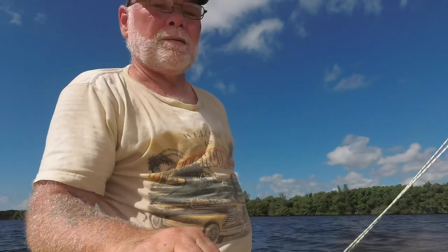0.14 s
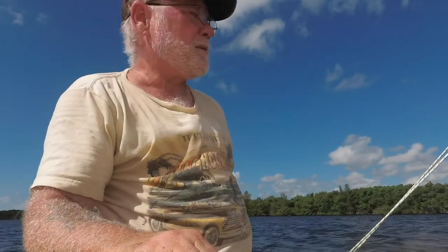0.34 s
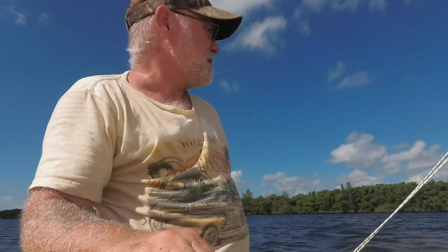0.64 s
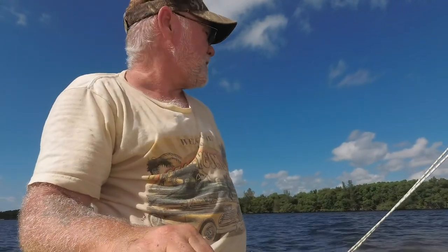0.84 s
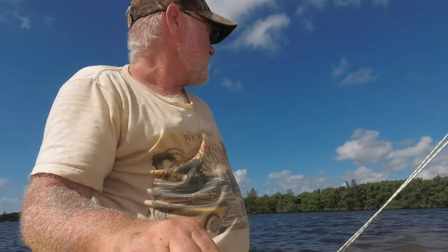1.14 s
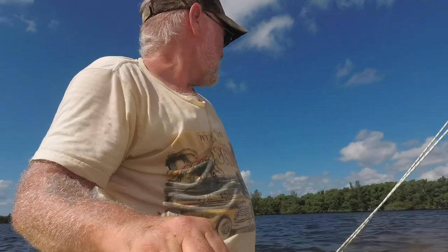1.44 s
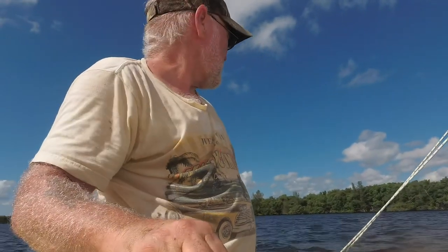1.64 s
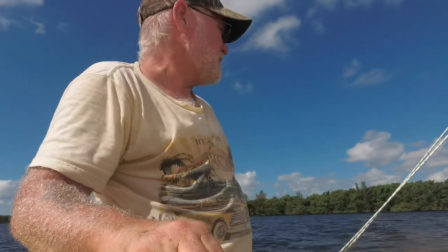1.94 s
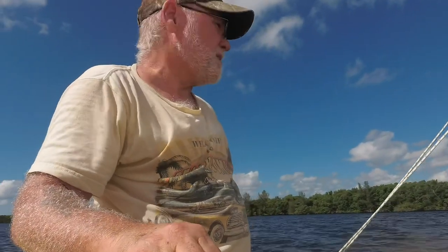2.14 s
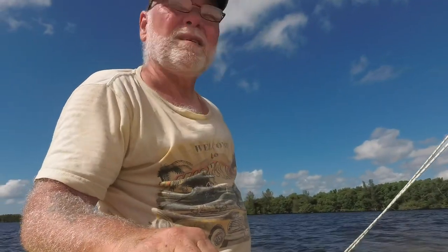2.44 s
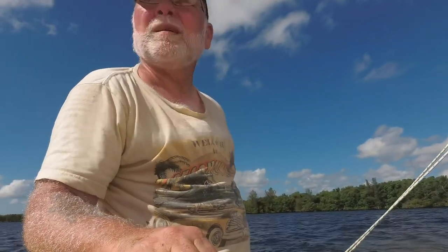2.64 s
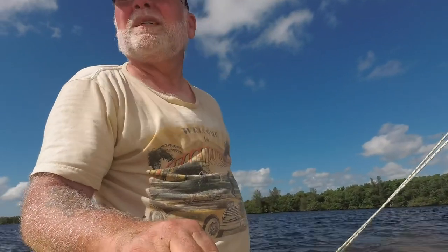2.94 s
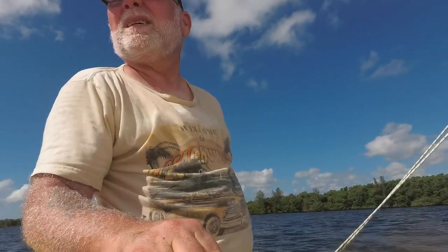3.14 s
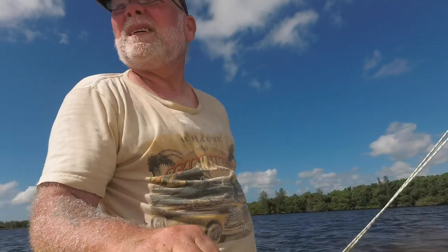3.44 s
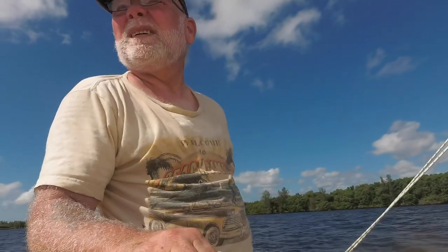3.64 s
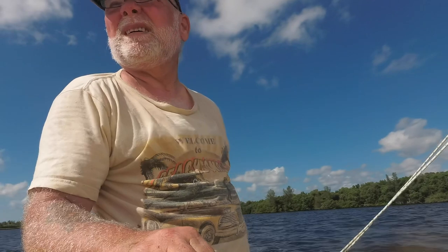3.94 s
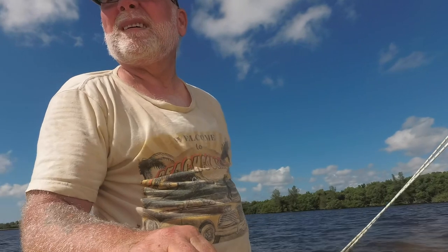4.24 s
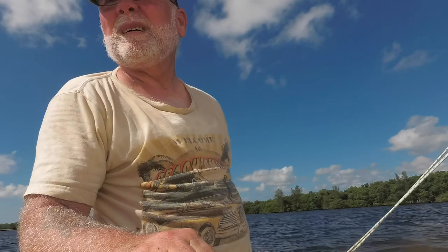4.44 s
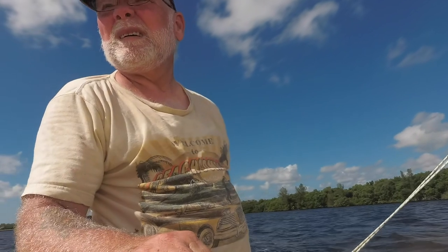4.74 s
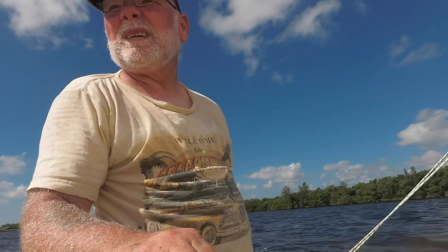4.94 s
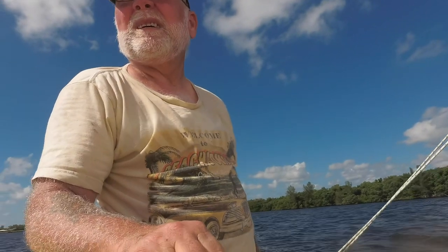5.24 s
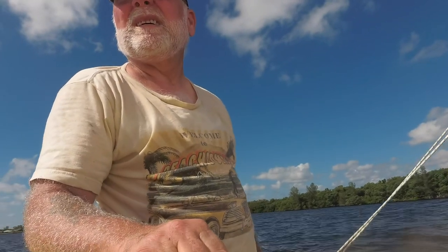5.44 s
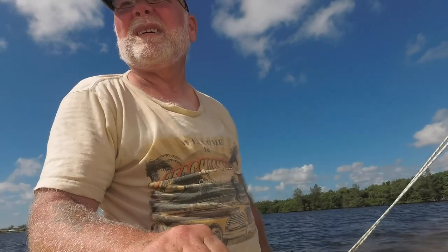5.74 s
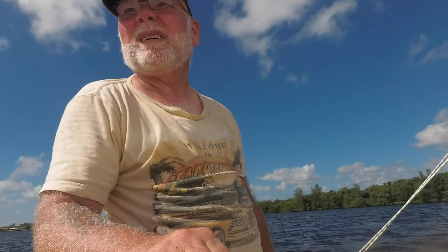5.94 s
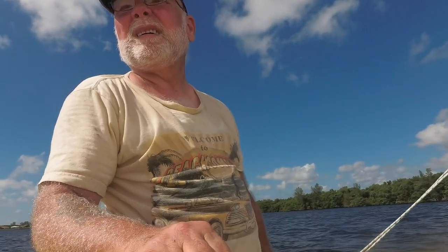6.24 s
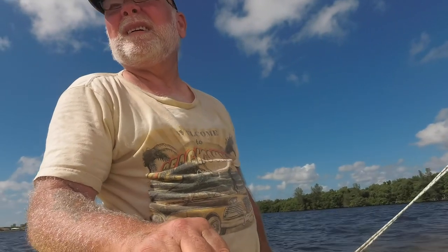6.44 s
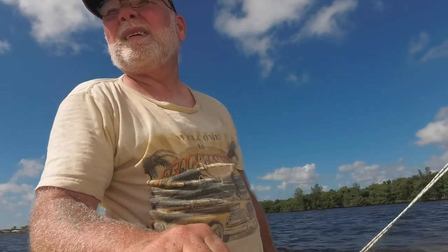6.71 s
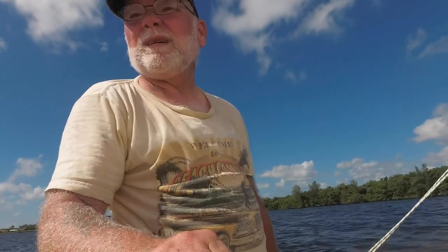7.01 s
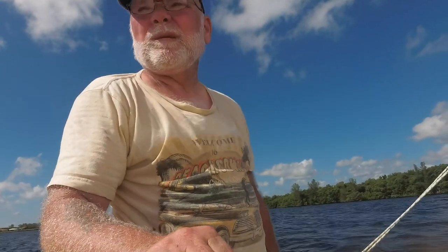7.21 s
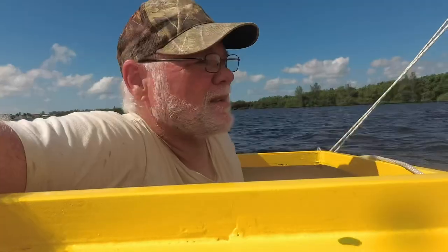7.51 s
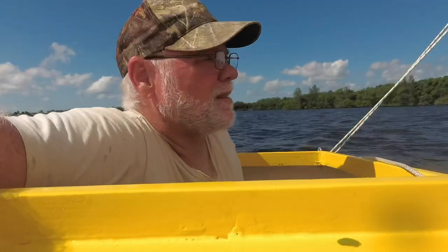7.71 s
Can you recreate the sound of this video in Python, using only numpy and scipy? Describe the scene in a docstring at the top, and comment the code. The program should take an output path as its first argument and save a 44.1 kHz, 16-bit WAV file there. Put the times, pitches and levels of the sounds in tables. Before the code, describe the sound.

Very close to the hollow hull of a small sailboat on a river, low hollow thumps and wet slaps come irregularly over steady lapping, with gurgles, plops and tiny drop ticks. They bunch up near three seconds; a heavy wave slams and clips past midway. A faint low hum steps up at the end under a brighter splashy rush. Right-heavy stereo, slight microphone hiss.

```python
"""On a river, close to the hollow hull of a small sailboat: water laps and slaps, heard by two microphones.
Air pockets thump as gliding tones and a shaken hull; crests ring the panels and drop spray; bubbles gurgle.
One heavy wave slams under the hull as short swings of pressure, so loud that the sound clips.
A faint motor-like hum of four partials runs underneath; near the end it steps up and noise rushes brighter.
Hiss and a thin buzzing whine lie behind it all, and the left microphone clicks once."""
import sys
import numpy as np
from scipy import signal
from scipy.fft import rfft, irfft, next_fast_len
from scipy.io import wavfile
from scipy.ndimage import uniform_filter1d, map_coordinates

SR = 44100
rng = np.random.default_rng(int(sys.argv[2]) if len(sys.argv) > 2 else 0)


def digitize_waveform(pressure):
    """Quantize a signal to 16-bit integers and store it at the path in sys.argv[1].

    Rows of a 2-D input are taken as channels; values are limited to [-1, 1].
    """
    field = np.atleast_2d(pressure).T
    bounded = np.clip(field, -1, 1)
    quanta = np.round(bounded * 32767).astype(np.int16)
    wavfile.write(sys.argv[1], SR, quanta)


N = 347111
TIME = np.arange(N) / SR
SHORT = np.arange(SR // 3) / SR  # time within one single sound, which is cut off after a third of a second

# All T60 and ring times are the time to fall by 60 dB.

# the steady lapping: [t/s, hull drone level/dB, ripple level/dB]; lapping() raises both a little
LAPPING = [(0.0, -30.5, -48.5), (0.52, -33, -48), (0.64, -38, -55), (1.16, -31, -45), (1.47, -34.5, -50.5),
           (2.85, -34, -49.5), (3.16, -36, -53.5), (3.45, -31, -46.5), (3.6, -32, -46.5),
           (3.86, -36, -58.5), (3.97, -32, -46), (4.1, -32, -50.5), (4.45, -33.5, -46.5),
           (4.84, -31.5, -48), (5.28, -34.5, -47), (5.63, -29, -45), (5.85, -31.5, -48), (6.18, -33, -46.5),
           (6.75, -32.5, -48.5), (7.34, -29, -45), (7.69, -41.5, -48), (7.87, -36, -46.5)]
# fizz along the waterline: [t/s, level/dB]; lapping() raises it a little
FIZZ = [(0.0, -58), (0.52, -62.5), (0.66, -61.5), (1.17, -59), (1.5, -63.5), (4.2, -61), (5.63, -60),
        (5.96, -62.5), (6.66, -61.5), (6.95, -56.5), (7.25, -54.5), (7.42, -59.5), (7.52, -52.5),
        (7.87, -78)]
FIZZ_GROWS = 0.19  # dB more fizz for each dB of ripple
# the hull heaves with each thump and settles after it; the ripples do the same around each slap
CHURN_RISE_S, CHURN_FALL_S = 0.0097, 0.039
SLOSH_RISE_S, SLOSH_FALL_S = 0.02, 0.024
CHURN_LAG_S = 0.0067  # the churning is strongest just after the blow
CHURN_DRONE_DB, CHURN_RIPPLE_DB = -13, -14.5  # churning against the peak of its thump or slap
CHURN_LIMIT_DB, SLOSH_LIMIT_DB = -29.5, -38.5  # the most drone and ripple that one wave can add

# the hollow hull's low resonances: [f/Hz, width/Hz, level/dB]
HULL = [(169.5, 56, -12.5), (176, 11, -4), (231.7, 58, -4), (255.45, 6.9, 6.5), (365.3, 18, -3)]
# resonances of the side panels: [f/Hz, width/Hz, level/dB]
PANELS = [(570, 114, 4), (696, 47, 0), (774, 13.7, 5), (845, 250, -0.5), (1098, 92, -4.5), (1211, 38, 6.5)]
# resonances of the stiff rim and other small hard parts: [f/Hz, width/Hz, level/dB]
RIM = [(1642, 190, 11), (1976, 35, 5.5), (2080, 180, 6), (2550, 112, 3.5), (3066, 52, 0.5), (3130, 110, -1),
       (3360, 65, 4.5), (3440, 114, -6), (3690, 130, -7)]

# air pockets squeezed under the hull: [t/s, peak level/dB, starting f/Hz]
THUMPS = [(0.023, -15.5, 259), (0.045, -18.5, 262), (0.076, -19.5, 229), (1.084, -16.5, 271),
          (1.119, -16, 162.3), (1.166, -24, 350.5), (1.801, -17, 365), (2.324, -19.5, 272),
          (2.908, -13, 223), (2.922, -14.5, 333), (2.945, -14, 330), (2.957, -13, 174), (2.995, -9, 237.4),
          (3.023, -9, 273), (3.194, -17.5, 241.6), (3.215, -9.5, 236), (3.257, -16.5, 338.6),
          (3.532, -12.5, 256), (3.767, -10.5, 257), (3.989, -19.5, 346), (4.088, -7, 220.4),
          (4.639, -3.5, 280), (4.654, 0, 205), (4.676, -12, 236), (4.694, -8.5, 238), (4.971, -12, 197),
          (5.198, -13.5, 329), (5.434, -6.5, 237), (5.447, -19, 197), (5.568, -12.5, 275.5),
          (5.676, -15, 259.6), (5.709, -15, 257), (5.743, -16, 365), (5.944, -16.5, 335.4),
          (6.129, -18, 189), (6.362, -17.5, 302), (6.38, -18, 354), (6.403, -11.5, 175), (6.42, -22, 165),
          (6.666, -15, 262), (6.985, -16.5, 352), (7.214, -11.5, 168), (7.248, -8.5, 255.5),
          (7.26, -5.5, 207), (7.268, -9.5, 364), (7.655, -8.5, 205), (7.665, -14.5, 298.6)]
MIDDLING_DB, THUMP_T60_S = -8.5, 0.11  # peak and ring of a middling thump
CHOKE = 0.61  # how much a harder thump shortens its ring: dB per dB

# crests breaking on the side, the big ones in several strokes:
# [t/s, peak level/dB, spray level against that peak/dB, pitch of the hollow under the crest f/Hz]
SLAPS = [(0.022, -26.5, -10, 810), (0.075, -35, -11, 850), (0.096, -37, -2, 900), (0.168, -33.5, -10, 695),
         (0.387, -28.5, -10, 1100), (0.5, -31.5, -6, 640), (0.729, -26, -12, 1160), (1.076, -44, -22, 900),
         (1.163, -24, -10.5, 770), (1.18, -25.5, -12, 756), (1.924, -33, -2.5, 860), (1.962, -32, -1, 740),
         (2.32, -24.5, -18, 770), (2.449, -34.5, -2, 730), (2.904, -27.5, 1, 1120), (2.914, -36, 0, 950),
         (2.939, -24.5, -4, 890), (2.948, -31, -1, 800), (2.966, -25.5, -4, 910), (2.974, -26.5, -5, 800),
         (2.986, -22.5, -9, 780), (3.252, -27, -27, 680), (3.264, -27, -25, 695), (3.277, -38, -27, 670),
         (3.52, -13, -5.5, 930), (3.526, -19, -4, 1110), (3.533, -21, -18, 756), (3.762, -25.5, 1, 890),
         (3.768, -25.5, -1, 840), (3.777, -31, -6, 796), (4.061, -33, -22, 640), (4.086, -23, -8.5, 735),
         (4.104, -32, -19, 700), (4.189, -27, -26, 900), (4.654, -34.5, -4, 895), (5.2, -32.5, -12, 920),
         (5.428, -20.5, -6, 760), (5.441, -25.5, -3, 760), (5.57, -21.5, -32, 920),
         (6.137, -34.5, -0.5, 930), (6.382, -29, -11, 604), (6.42, -27.5, -29, 590), (6.986, -29, -17, 600),
         (7.203, -26, -10, 800), (7.22, -28, -16, 880), (7.248, -35, -14, 570), (7.264, -24, -20, 650),
         (7.648, -22, -6, 980), (7.656, -23, -11, 820), (7.669, -45, -19, 780)]
SMACK_ATTACK_S, SMACK_T60_S, SPRAY_T60_S = 0.001, 0.054, 0.072  # every slap dies away alike
SPRAY_DROPS_PER_S = 2600  # average number of drops landing from a breaking crest
IMPACT_DB = 21  # the crest's first contact against the noisy push that follows

# the heaviest wave slams flat under the hull in quick blows: [t/s, level/dB]
SLAMS = [(4.6428, 3), (4.6545, -0.5), (4.6789, -2.5), (4.698, -2.5)]
SLAM_HZ, SLAM_WIDTH_S = 244, 0.002  # the hull's swing under a blow; half the length of the blow
SLAM_CRACK_DB = -38.5  # the panels' crack against the blow

# large air pockets that boom on after a wave: [t/s, level/dB, starting f/Hz, ring/s]
GULPS = [(3.79, -19, 246, 0.083), (4.66, -8, 366, 0.11), (4.699, -12.5, 150.2, 0.28),
         (4.831, -28.5, 256.6, 0.92), (5.75, -18.5, 363, 0.085), (6.84, -26, 359.3, .12),
         (7.275, -20.5, 363, .13)]
# air breaking up into a cluster of small bubbles: [t/s, peak level/dB, middle f/Hz, length/s]
GURGLES = [(0.074, -30.5, 853, .045), (0.089, -39, 1560, 0.019), (0.155, -34, 920, 0.053),
           (0.515, -43, 1040, 0.025), (0.978, -44, 1580, 0.022), (0.968, -37.5, 828, 0.032),
           (2.149, -42, 960, 0.022), (2.955, -30, 750, .045), (3.071, -35.5, 710, 0.0204),
           (3.46, -37.5, 1630, .015), (3.556, -39, 1040, 0.045), (3.677, -38.5, 1170, 0.022),
           (3.952, -37.5, 866, 0.023), (3.998, -31, 770, 0.045), (4.283, -38, 1080, 0.027),
           (4.398, -44, 1070, .02), (4.447, -44, 1920, 0.035), (4.506, -30, 746, .04),
           (4.866, -42.5, 1125, .05), (5.443, -31, 765, 0.0147), (5.494, -38, 1195, 0.028),
           (5.692, -40, 1060, .015), (5.749, -37.5, 1060, .015), (5.778, -36, 1090, 0.052),
           (6.237, -39, 1030, 0.045), (6.749, -44, 1630, .015), (6.904, -37.5, 1190, 0.018),
           (7.22, -27.5, 818, 0.03), (7.235, -36.5, 1600, 0.035), (7.528, -32, 920, .02)]
GURGLE_SPREAD, GURGLE_CYCLES = 0.077, 31  # scatter of pitch in a cluster; ring of a bubble in cycles
# single large bubbles: [t/s, peak level/dB, f/Hz, ring/s]; bubbles() starts them slightly lower
BUBBLES = [(0.168, -31, 574, 0.24), (0.903, -36, 1090, 0.051), (0.905, -36.5, 565, 0.099),
           (0.998, -32.5, 693, .07), (1.674, -39, 1207, 0.078), (1.807, -31.5, 496, 0.063),
           (2.643, -36.5, 1625, 0.045), (2.92, -28, 743, 0.039), (2.973, -22, 767, 0.11),
           (3.292, -25.5, 600, 0.036), (3.517, -27, 830, 0.087), (3.785, -28.5, 751, 0.058),
           (4.06, -27.5, 609, 0.06), (4.469, -39.5, 1600, 0.052), (4.76, -38, 1116, 0.081),
           (4.779, -35, 763, 0.078), (5.361, -31, 586, 0.12), (5.987, -36.5, 536, 0.085),
           (5.565, -30.5, 934, 0.049), (6.262, -24.5, 862, 0.065), (6.597, -25.5, 589, 0.15),
           (7.263, -25.5, 574, 0.094), (7.29, -29, 587, 0.16)]
# single drops ticking on the side: [t/s, peak level/dB, f/Hz]
DROPS = [(0.096, -44, 2020), (0.517, -43, 2030), (1.141, -40, 1730), (1.786, -44, 2050), (1.994, -39, 1660),
         (2.705, -42, 3810), (2.883, -42, 2580), (2.973, -34, 2070), (3.005, -35, 1600), (3.017, -42, 1940),
         (3.086, -45, 2580), (3.2567, -32, 1530), (3.6237, -42, 3600), (3.674, -43.5, 2000),
         (4.983, -33.5, 1630), (5.303, -42, 1750), (5.381, -38, 2010), (7.105, -47, 2630),
         (7.129, -41, 3380), (7.15, -38, 1900), (7.371, -37.5, 2400), (7.648, -24.5, 3400)]

# resonances of the rush along the hull at the end: [f/Hz, width/Hz, level/dB]
WASH = [(258, 16, 18), (815, 120, -24), (1200, 37, -26), (1690, 400, -32), (2040, 90, -24.5),
        (2550, 90, -25), (3380, 300, -23), (3910, 200, -23.5), (4800, 680, -27)]
# the rush as a whole: [t/s, level/dB]
WASH_LEVEL = [(7.45, -31.5), (7.54, -28), (7.63, -32.5), (7.7, -35), (7.76, -34), (7.82, -30.5),
              (7.87, -32.5)]
WASH_START_S = 7.45
# spurts of that rush: [t/s, peak level/dB, f/Hz]
SPURTS = [(7.451, -48, 2090), (7.464, -35, 1230), (7.497, -35.5, 2550), (7.524, -37, 2570),
          (7.526, -39, 2080), (7.572, -44, 3940), (7.585, -39, 1210), (7.607, -41, 1220),
          (7.658, -38, 2660), (7.672, -32, 3450), (7.684, -39, 4000), (7.696, -37, 4800),
          (7.718, -42, 4000), (7.795, -44, 4250), (7.817, -37, 3980)]
SPURT_T60_S, SPURT_WIDTH_HZ = 0.057, 170  # every spurt dies away alike and fills a narrow band

# a low hum, as of a small electric motor: [t/s, f/Hz, level/dB]
MOTOR = [(0, 73.68, -31.5), (7.44, 74.02, -38), (7.455, 81.5, -20), (7.87, 81.3, -20)]
# the hum's partials: [multiple of the hum's pitch, level against the hum/dB]
PARTIALS = [(1, -28.5), (2, -11.5), (3, -3), (4, -24.5)]

# left microphone against the right: [f/Hz, level/dB, lead/radians]
LEFT = [(50, -14, 1.5), (250, -11, 0.64), (407, -12.5, 0), (617, -8.5, 0.82), (1230, -8.5, 0.2),
        (1590, -17, 2), (2140, -13, -2.5), (2580, -3, 1), (2720, -9.5, 1.5), (3320, -6, 5),
        (3580, -22, 0.5), (4600, -6.5, 2.5)]
# colour of the microphone hiss: [f/Hz, relative level per Hz/dB]
HISS = [(20, 20.5), (3000, 11), (8000, 9), (10500, 10), (12500, 12), (14000, 12.5), (15800, -1.5)]
WHINE_HZ, BUZZ_HZ = 15703, 59.94  # pitch of the whine; how often a second its level pulses
CLICK_S = 5.0384
TOP_HZ = 15870  # nothing is heard above this


def lapping():
    """Small waves keep the hull droning; ripples gurgle and fizz on its side, and every blow churns them up."""
    drone_db, ripple_db = curves(LAPPING)
    fizz_db, = curves(FIZZ)
    thump_blows = [(s, min(db + CHURN_DRONE_DB, CHURN_LIMIT_DB)) for s, db, _ in THUMPS]
    slap_blows = [(s, min(db + CHURN_RIPPLE_DB, SLOSH_LIMIT_DB)) for s, db, *_ in SLAPS]
    heave = churn(thump_blows, CHURN_RISE_S, CHURN_FALL_S)
    slosh = churn(slap_blows, SLOSH_RISE_S, SLOSH_FALL_S)
    lap = wobble(14)

    pockets = bubble_crowd(count=200, low_hz=160, high_hz=340, cycles=26, spread_db=6)
    plops = bubble_crowd(count=2200, low_hz=520, high_hz=1500, cycles=20, spread_db=8)
    beads = bubble_crowd(count=2200, low_hz=1400, high_hz=3800, cycles=24, spread_db=10)

    hull_noise = ring(pair(N, own=0.047), HULL, low_hz=24.1, high_hz=375.4)
    drone = unit(patchy(hull_noise, depth_db=1.5)) + amp(-12.0) * pockets
    splashing = plops + 4.9 * spatter(N, per_s=1200, own=0.59)
    ripple = unit(patchy(ring(splashing, PANELS, low_hz=340, high_hz=1161), depth_db=3.0))
    fine_drops = beads + 4 * spatter(N, per_s=1000, own=0.31)
    fizz = unit(ring(fine_drops, RIM, low_hz=920, high_hz=3900))

    # steady and churned-up parts add as power
    droning = np.sqrt(amp(drone_db + 2.0) ** 2 + heave)
    rippling = np.sqrt(amp(ripple_db + 3.5) ** 2 + slosh)
    # livelier ripples throw up more fizz
    fizzing = amp(fizz_db + 4.0) * (rippling / np.median(rippling)) ** FIZZ_GROWS
    # all three swell and sink together, the fizz most
    out = drone * droning * amp(1.0 * lap)
    out = out + ripple * rippling * amp(0.96 * lap)
    return out + fizz * fizzing * amp(1.66 * lap)


def thumps():
    """Each wave traps a pocket of air that throbs briefly and shakes the hull."""
    out = np.zeros((2, N))
    # the wave's weight on the hull changes its damping: narrower resonances
    loaded = [(hz, 0.65 * width, level) for hz, width, level in HULL]
    for s, db, hz in THUMPS:
        t60 = THUMP_T60_S * amp(-CHOKE * (db - MIDDLING_DB))
        pocket = bubble(hz, t60, attack=0.0038, rise=0.054)
        push = pair(len(SHORT), own=0.45) * swell(0.00081, 0.5 * t60)
        shake = peaked(ring(push, loaded, low_hz=73.0, high_hz=415))
        add(out, s - .003, amp(db) * peaked(0.87 * pocket + 0.66 * shake))
    # keep only the low part
    return filtered(out, lambda hz: 1 / np.sqrt(1 + (hz / 460) ** 20))


def slaps():
    """A crest hits the panels and rings the hollow under it; its spray lands as drops that rattle the rim."""
    out = np.zeros((2, N))
    n = len(SHORT)
    contact = swell(attack=.0005, t60=.04)
    # a single-sample knock, one millisecond in
    impact = amp(IMPACT_DB) * np.diff(SHORT >= .001, prepend=False)
    for s, db, spray_db, hz in SLAPS:
        push = pair(n, own=0.31) * swell(SMACK_ATTACK_S, SMACK_T60_S)
        smack = ring(impact + push, PANELS, low_hz=355, high_hz=1142)
        hollow = ring(smack, [(hz, 0.35 * hz, 0)], low_hz=196, high_hz=2000)
        spray = spatter(n, SPRAY_DROPS_PER_S, own=0.82) * (swell(0.0012, SPRAY_T60_S) + contact)
        rattle = peaked(ring(spray, RIM, low_hz=900, high_hz=3580))
        snap = peaked(ring(spray * swell(.001, .08), [(4960, 670, 0)], low_hz=3020, high_hz=6500))
        body = amp(db) * peaked(0.12 * smack + hollow)
        splash = amp(db + spray_db) * (rattle + amp(-22.5) * snap)
        add(out, s - .002, body + splash)
    return out


def slams():
    """Flat water hits the hull: one hard push, a suck back, and a short crack from the panels."""
    out = np.zeros(N)
    for s, db in SLAMS:
        t = TIME - s
        swing = np.sin(2 * np.pi * SLAM_HZ * t) * np.exp(-(t / SLAM_WIDTH_S) ** 2 / 2)
        out -= amp(db) * peaked(swing)
        blow = rng.standard_normal(len(SHORT)) * swell(.0005, 0.022)
        crack = ring(blow, PANELS, low_hz=400, high_hz=3000)
        add(out, s - .001, amp(db + SLAM_CRACK_DB) * peaked(crack))
    # take out the deepest part
    return filtered(out, lambda hz: 1 - 1 / (1 + (hz / 115) ** 6))


def gulps():
    """A large pocket of air, pushed under by a wave, keeps booming as it slides along the hull."""
    out = np.zeros(N)
    for s, db, hz, t60 in GULPS:
        add(out, s, amp(db) * bubble(hz, t60, attack=0.01, rise=0.03))
    return out


def bubbles():
    """Large bubbles plop beside the hull and stir its panels."""
    out = np.zeros(N)
    for s, db, hz, t60 in BUBBLES:
        plop = bubble(.98 * hz, t60=t60, attack=.012, rise=.05)
        push = rng.standard_normal(len(SHORT)) * swell(0.015, 0.083)
        stir = ring(push, PANELS, low_hz=396, high_hz=1170)
        add(out, s - .005, amp(db) * peaked(plop + 0.22 * peaked(stir)))
    return out


def gurgles():
    """A pocket of air breaks up: six small bubbles of like size ring in quick succession."""
    out = np.zeros(N)
    for s, db, hz, length in GURGLES:
        cluster = np.zeros(N)
        for k, (when, size, loud) in enumerate(rng.uniform(-1.073, 1, size=(6, 3))):
            pitch = hz * (1 + GURGLE_SPREAD * size)
            start = length * (k + .5 + .5 * when) / 6
            one = bubble(pitch, GURGLE_CYCLES / pitch, attack=.003, rise=.04)
            add(cluster, start, amp(3 * loud) * one)
        add(out, s - .005, amp(db) * peaked(cluster[:len(SHORT)]))
    return out


def drops():
    """A drop ticks on the side and rings for a few cycles."""
    out = np.zeros((2, N))
    for s, db, hz in DROPS:
        touch = pair(len(SHORT), own=0.97) * swell(0.00032, 0.072)
        tick = ring(touch, [(hz, hz / 14, 0)], low_hz=1000, high_hz=1.52 * hz)
        add(out, s - .002, amp(db) * peaked(tick))
    return out


def wash():
    """Near the end, water rushes along the hull in a rough, splashy stream."""
    start = np.clip((TIME - WASH_START_S) / 0.0047, 0, 1)
    level_db, = curves(WASH_LEVEL)
    beads = bubble_crowd(count=2500, low_hz=2000, high_hz=5000, cycles=22, spread_db=11)
    stream = .8 * pair(N, own=.5) + .5 * spatter(N, per_s=1500, own=.5)
    flow = ring(0.27 * beads + stream, WASH, low_hz=121, high_hz=4300)
    rush = unit(patchy(flow, depth_db=1.5))
    swells_db = 1.6 * wobble(16)
    return start * amp(level_db + swells_db) * rush


def spurts():
    """The rush throws up handfuls of drops, each handful ringing at its own pitch."""
    out = np.zeros((2, N))
    for s, db, hz in SPURTS:
        shower = spatter(len(SHORT), per_s=1600, own=0.47) * swell(0.0013, SPURT_T60_S)
        spurt = ring(shower, [(hz, SPURT_WIDTH_HZ, 0)], low_hz=900, high_hz=1.4 * hz)
        add(out, s - .002, amp(db) * peaked(spurt))
    return out


def motor():
    """A low hum carried by the hull, made of wavering partials; it is higher and louder near the end."""
    hz, db = curves(MOTOR)
    turn = 2 * np.pi * np.cumsum(hz * (1 + 0.0033 * wobble(5))) / SR
    partials = sum(amp(level + 2.3 * wobble(7.5)) * np.sin(round(k) * turn) for k, level in PARTIALS)
    return amp(db) * partials


def hiss():
    """Microphone noise, partly shared and partly each microphone's own, a little louder on the right."""
    noise = filtered(pair(N, own=1.42), lambda hz: along(HISS, hz))
    return unit(noise) * amp([[-59.5], [-57.5]])


def whine():
    """A thin, very high tone of unsteady pitch whose level pulses fast enough to buzz; the right is louder."""
    buzz = 1 + .45 * np.cos(2 * np.pi * BUZZ_HZ * TIME)
    phase = 2 * np.pi * WHINE_HZ * TIME + .7 * wobble(8) + 0.25 * wobble(130)
    return buzz * np.sin(phase) * amp([[-75], [-60]])


def click(db=-3, hz=240, t60=0.014):
    """A sudden step in the left microphone that swings back and settles within a few milliseconds."""
    out = np.zeros((2, N))
    step = -amp(db - 60 * SHORT / t60) * np.cos(2 * np.pi * hz * SHORT)
    add(out[0], CLICK_S, filtered(step, lambda f: 1 / (1 + 1j * f / 5500)))
    return out


def bubble(hz, t60, attack, rise):
    """Trapped air rings, and its pitch climbs as it nears the surface."""
    pitch = hz * (1 + rise * np.minimum(SHORT / t60, 1))
    return swell(attack, t60) * np.sin(2 * np.pi * np.cumsum(pitch) / SR)


def bubble_crowd(count, low_hz, high_hz, cycles, spread_db):
    """A crowd of small, quickly damped bubbles of uneven size, rms 1."""
    out = np.zeros(N)
    t = SHORT[:SR // 10]
    for when, size, loud in rng.random((count, 3)):
        hz = low_hz * (high_hz / low_hz) ** size
        chirp = np.sin(2 * np.pi * hz * t * (1 + t))
        life = (1 - np.exp(-t / 0.0072)) * amp(-60 * t * hz / cycles)
        add(out, when * N / SR, amp(spread_db * loud ** 2) * life * chirp)
    return unit(out)


def spatter(size, per_s, own):
    """Separate drops of uneven size landing at random, as two microphones hear them."""
    lands = rng.random(size) < per_s / SR
    return unit(pair(size, own) * lands)


def churn(blows, rise_s, fall_s):
    """Power of the water's heaving around blows (t/s, level/dB): a quick rise, a slower fall."""
    power = 0
    for s, db in blows:
        after = TIME - s - CHURN_LAG_S
        power = power + amp(db) ** 2 * np.exp(-np.maximum(-after / rise_s, after / fall_s))
    return power


def patchy(x, depth_db):
    """Gain that drifts by itself in each narrow band, as hollows open and close in the water."""
    z = signal.stft(x, nperseg=512)[2]
    field = rng.standard_normal(z.shape[1:])
    # smooth over neighbouring bands and moments
    for _ in range(2):
        field = uniform_filter1d(uniform_filter1d(field, size=2, axis=0), size=6, axis=1)
    return signal.istft(z * amp(depth_db * unit(field)), nperseg=512)[1][..., :N]


def ring(x, modes, low_hz, high_hz):
    """x through a set of resonances that radiate between two corner frequencies."""
    def response(f):
        body = sum(amp(db) * 1j * f * w / (c * c - f * f + 1j * f * w) for c, w, db in modes)
        low_cut = (1j * f / (low_hz + 1j * f)) ** 2
        return body * low_cut / np.sqrt(1 + (f / high_hz) ** 20)
    return filtered(x, response)


def filtered(x, response):
    """x times a complex response of frequency."""
    n = x.shape[-1]
    m = next_fast_len(n + SR // 4)
    return irfft(rfft(x, m) * response(np.fft.rfftfreq(m, 1 / SR)), m)[..., :n]


def pair(size, own):
    """Noise at two microphones: a common part and a share of their own."""
    return rng.standard_normal(size) + own * rng.standard_normal((2, size))


def swell(attack, t60):
    """A soft rise and an exponential fall, peak 1."""
    return peaked((1 - np.exp(-SHORT / attack)) * amp(-60 * SHORT / max(t60, .01)))


def wobble(rate):
    """A smooth random curve, rate knots a second."""
    return map_coordinates(rng.standard_normal(int(N * rate / SR) + 4), [TIME * rate])


def curves(rows):
    """One value per sample for each column after the time."""
    s, *cols = np.transpose(rows)
    return [np.interp(TIME, s, c) for c in cols]


def along(points, hz):
    """(f/Hz, level/dB) points as gains on a log axis."""
    f, db = np.transpose(points)
    return amp(np.interp(np.log(hz + 1), np.log(f + 1), db))


def add(track, s, sound):
    """Mix a sound into a track at a time."""
    start = min(max(round(s * SR), 0), N - 1)
    track[..., start:start + sound.shape[-1]] += sound[..., :N - start]


def amp(db):
    """Decibels to gain."""
    return 10 ** (np.asarray(db) / 20)


def unit(x):
    """Scale to rms 1."""
    return x / np.sqrt(np.mean(x ** 2) + 1e-20)


def peaked(x):
    """Scale to peak 1."""
    return x / (np.abs(x).max() + 1e-20)


def scene():
    """The sounds reach the right microphone more strongly than the left, and out of step with it."""
    water = lapping() + thumps() + slaps() + slams() + gulps() + bubbles() + gurgles() + drops()
    left, right = water + wash() + spurts() + motor()
    at_hz, db, radians = np.transpose(LEFT)
    log_gain = np.log(amp(db)) + 1j * radians  # level and lead in one complex number

    def shade(hz):
        return np.exp(np.interp(np.log(hz + 1), np.log(at_hz + 1), log_gain))
    return np.array([filtered(left, shade), right])


def record(dry):
    """The microphones add hiss, whine and one click; whatever is too loud clips, and the top is cut off."""
    clipped = np.clip(dry + hiss() + whine() + click(), -.975, .975)
    return filtered(clipped, lambda hz: hz < TOP_HZ)


dry = scene()
out = record(dry)
digitize_waveform(out)
```